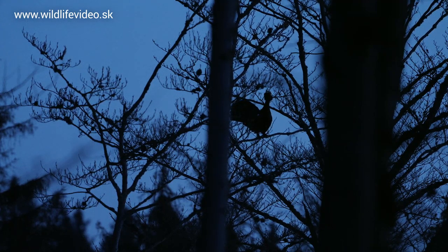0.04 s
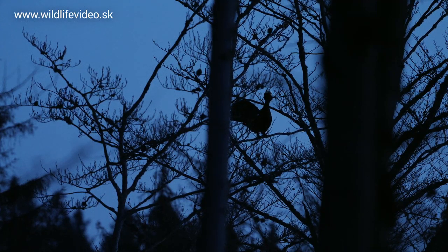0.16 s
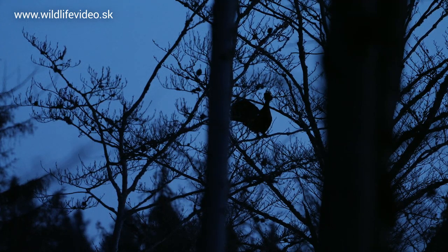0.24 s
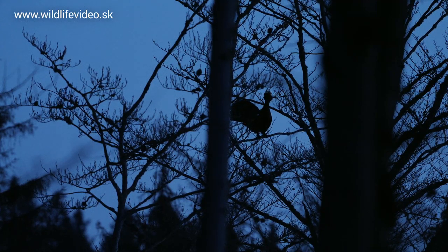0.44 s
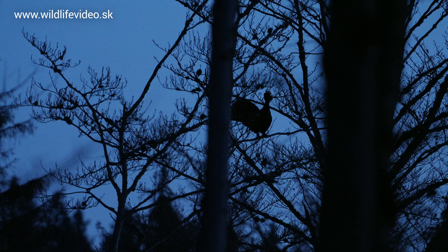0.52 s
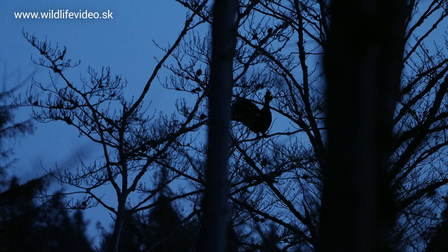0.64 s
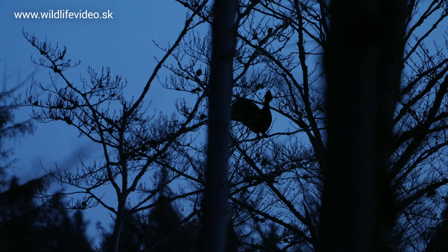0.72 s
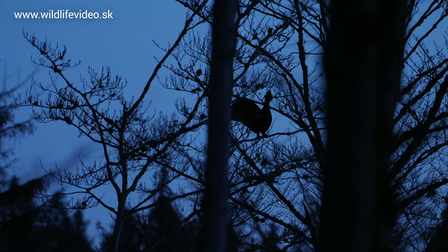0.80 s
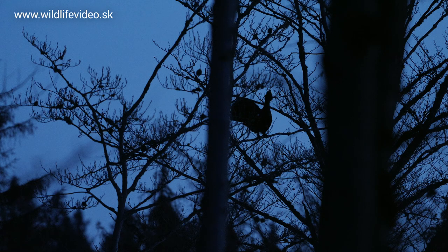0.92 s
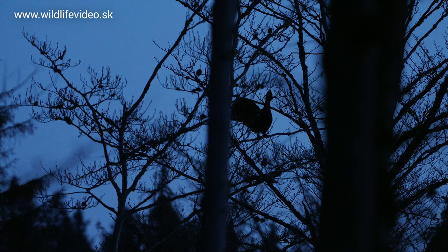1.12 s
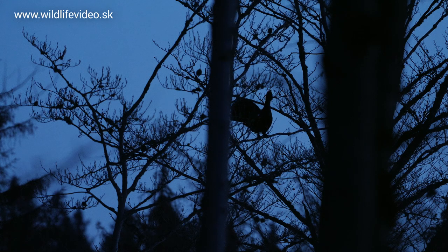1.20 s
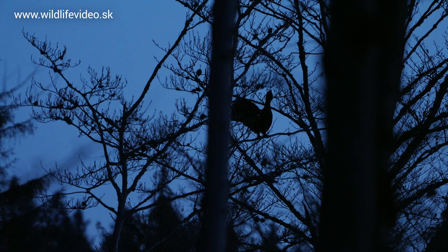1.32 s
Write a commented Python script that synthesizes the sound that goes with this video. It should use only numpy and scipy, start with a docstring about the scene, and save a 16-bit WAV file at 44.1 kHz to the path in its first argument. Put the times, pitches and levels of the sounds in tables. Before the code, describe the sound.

A capercaillie makes three sharp, hollow clicks at about 0.2, 0.35 and 0.4 seconds, each weaker, with a slight echo from the trees and soft low thuds underneath. Just before, a small bird gives a brief buzzy whistle that rises and falls. From 0.5 to about 1.3 seconds, small birds chirp faintly further off. A soft, steady forest hush continues throughout.

```python
"""A still forest at dawn, with a soft steady hush throughout. First a small bird gives a buzzy whistle.
From 0.2 s a capercaillie on a branch makes three hollow clicks, over a few soft low thuds.
Each click rings its throat and beak, a low pop follows, and the trunks scatter it back.
From 0.5 s on, small birds sing further off."""
import sys
import numpy as np
from scipy import signal
from scipy.io import wavfile
from scipy.ndimage import uniform_filter1d

SR = 44100
rng = np.random.default_rng(int(sys.argv[2]) if len(sys.argv) > 2 else 0)


def store_pcm(level_fs):
    """Save levels as 16-bit WAV."""
    pcm = np.round(np.clip(level_fs, -1, 1) * 32767).astype(np.int16)
    wavfile.write(sys.argv[1], SR, np.atleast_2d(pcm).T)


N = 59535


def amp(db):
    return 10 ** (np.asarray(db) / 20)


def unit_strength(x):
    return x / np.sqrt(np.mean(x ** 2) + 1e-20)


def look_up(table, hz):
    """A table's value at any pitch, blended between its rows."""
    row_hz, value = np.transpose(table)
    return np.interp(np.log(hz + 1), np.log(row_hz), value)


def add(mix, start_s, sound):
    part = mix[max(round(start_s * SR), 0):][:len(sound)]
    part += sound[:len(part)]


def drift(count, size):
    """A smooth random wobble; a bigger size makes it slower."""
    return unit_strength(uniform_filter1d(uniform_filter1d(rng.standard_normal(count), size), size))


def tone(hz):
    return np.sin(2 * np.pi * np.cumsum(hz) / SR)


# How strong the hush is from low to high: (pitch [Hz], relative level [dB])
HUSH_SHAPE = [(20, -11), (40, -13.5), (100, -25.5), (170, -33.5), (215, -28), (300, -14), (400, -5.5),
              (500, -6), (590, 0.5), (660, -8.5), (770, -1.5), (1100, -8.5), (1700, -10.5), (2700, -8.5),
              (3350, -13), (3800, -12.5), (5000, -26), (5700, -35.5), (6500, -40.5), (15500, -39.5)]
def hush(level_db=-52, patchy_db=1.5):
    """Steady distant air in the forest, slightly patchy."""
    hz, _, noise = signal.stft(rng.standard_normal(N), SR, nperseg=2048, noverlap=1536)
    patches = uniform_filter1d(rng.standard_normal(noise.shape), size=8, axis=0)
    patches = unit_strength(uniform_filter1d(patches, size=10, axis=1))
    noise *= amp(look_up(HUSH_SHAPE, hz)[:, None] + patchy_db * patches)
    air = signal.istft(noise, SR, nperseg=2048, noverlap=1536)[1][:N]
    return amp(level_db) * unit_strength(air)


# Soft bumps: (time [s], pitch [Hz], fade time [s], level [dB]). A fade time is a drop of 60 dB.
THUDS = [(0.213, 24, 0.38, -48), (0.305, 67, 0.034, -40.5), (0.352, 188.5, 0.099, -52)]
def thuds():
    """Dull low thuds that die away quickly."""
    out, t = np.zeros(N), np.arange(SR // 2) / SR
    rise = 1 - np.exp(-t / 0.0016)
    for start, hz, fade_s, db in THUDS:
        add(out, start, rise * amp(db - 60 * t / fade_s) * np.sin(2 * np.pi * hz * t))
    return out


# How long sound lingers among the trees: (pitch [Hz], fade time [s])
FOREST_FADE = [(200, 0.41), (1500, 0.97), (2700, 0.5), (5000, 0.21), (12000, 0.17)]
def forest_echo(x):
    """The trees scatter sound into a soft blur; the highest pitches die first."""
    hz, t, noise = signal.stft(rng.standard_normal(SR), SR, nperseg=256)
    fade = amp(-60 * t / look_up(FOREST_FADE, hz)[:, None])
    rise = np.minimum(t / 0.0053, 1)
    tail = signal.istft(noise * fade * rise, SR, nperseg=256)[1]
    return signal.fftconvolve(x, tail / np.linalg.norm(tail))[:N]


# One echo for each trunk: (delay [s], level [dB], dulled above [Hz])
TRUNK_ECHOES = [(.0235, -23.5, 6000), (0.0463, -21.5, 1890), (.0529, -27, 2060), (0.0703, -25.5, 2200)]
def trunk_echoes(x):
    """The nearest trunks throw the sound back, duller than before."""
    out = np.zeros(N)
    for delay, db, dull_hz in TRUNK_ECHOES:
        dull = signal.butter(2, dull_hz, fs=SR, output="sos")
        add(out, delay, amp(db) * signal.sosfilt(dull, x))
    return out


# Far songbird notes: (time [s], length [s], start pitch [Hz], end pitch [Hz], level [dB])
FAR_NOTES = [(0.506, 0.068, 2320, 2210, -62), (.57, .16, 3480, 3895, -62), (.62, 0.234, 3736, 3807, -61),
             (0.777, 0.029, 2850, 2600, -71), (0.89, 0.032, 2820, 2710, -59),
             (0.909, .04, 2253, 2307, -58.5), (1.006, 0.03, 2783, 2510, -56),
             (1.089, 0.028, 2830, 2576, -54), (1.141, 0.053, 2280, 2173, -56.5),
             (1.203, 0.0175, 4200, 3270, -53.5), (1.21, .018, 3114, 2036, -51.5),
             (1.269, 0.022, 3690, 2880, -55), (1.288, 0.026, 2810, 2530, -55)]
def far_birds(echo_db=-3.5, waver=0.028):
    """Faint sliding whistles, blurred by the trees."""
    out = np.zeros(N)
    for start, length, from_hz, to_hz, db in FAR_NOTES:
        progress = np.linspace(0, 1, int(length * SR))
        pitch = from_hz + (to_hz - from_hz) * progress
        pitch *= 1 + waver * drift(N, size=70)[:len(pitch)]
        add(out, start, amp(db) * np.sqrt(2) * np.sin(np.pi * progress) * tone(pitch))
    return out + amp(echo_db) * forest_echo(out)


# The path of the buzzy whistle: (time [s], pitch [Hz], level [dB])
WHISTLE_PATH = [(0, 1950, -43.5), (0.032, 2250, -50.5), (0.044, 2900, -43), (0.065, 3250, -38),
                (0.09, 3350, -37), (0.104, 3200, -48.5), (.125, 2320, -40.5), (0.152, 1920, -45),
                (0.188, 1884, -53), (.215, 1895, -56)]
def buzzy_bird(trill_hz=211.1, swing_hz=248, echo_db=-6.5):
    """A whistle that arches up and down with a fast, uneven trill on it."""
    t = np.arange(N) / SR
    times, hz, db = np.transpose(WHISTLE_PATH)
    trill = tone(trill_hz * (1 + 0.099 * drift(N, size=200)))
    pitch = np.interp(t, times, hz) + swing_hz * trill + 70 * drift(N, size=30)
    voice = tone(pitch) * amp(np.interp(t, times, db)) * (t < times[-1])
    return voice + amp(echo_db) * forest_echo(voice)


# The tones of the throat and beak:
# (pitch [Hz], base fade time [s], level in click 1 [dB], in click 2 [dB], in click 3 [dB])
THROAT_TONES = [(743.3, 0.073, -36, -37.5, -42), (1075, 0.024, -27, -30.5, -38),
                (1270, 0.012, -26.5, -21, -58), (1490, 0.075, -16.5, -26, -30.5),
                (2250, 0.045, -14.5, -22.5, -42), (2537, 0.045, -15.0, -18.5, -33),
                (2658, 0.022, -7, -50, -27.5), (2807, 0.0055, -2.5, -57, -16.5),
                (3194, 0.026, -15.0, -16, -30), (3740, 0.026, -34, -20, -31.0),
                (4148, 0.036, -31, -34, -40), (4590, 0.037, -41, -46, -63), (4970, 0.017, -41, -70, -77)]
def throat_ring(t, click_index, fade_scale):
    """The throat and beak ring with many tones at once; every other one starts upside down."""
    ring = np.zeros(len(t))
    for row, (hz, fade_s, *levels) in enumerate(THROAT_TONES):
        fade = amp(levels[click_index] - 60 * t / (fade_s * fade_scale))
        ring += (-1) ** row * fade * np.sin(2 * np.pi * hz * t)
    return ring


def throat_push(t, hz=1130, width_s=0.00052):
    """A small soft push as the throat opens."""
    from_peak = t - 3 * width_s
    return np.exp(-(from_peak / width_s) ** 2) * np.cos(2 * np.pi * hz * from_peak)


def low_pop(t, hz, rise_s=0.0064, fade_s=0.047, sag=0.11, sag_s=0.008):
    """A low tone that swells and fades while its pitch sags."""
    swell = np.minimum(t / rise_s, 1) * amp(-60 * np.maximum(t - rise_s, 0) / fade_s)
    return swell * tone(hz * (1 + sag * (np.exp(-t / sag_s) - 0.5)))


# The three clicks: (time [s], ring length [times base], pop delay [s], middle pop pitch [Hz],
# pop level [dB], tick level [dB], rebound delay [s], rebound level against the click [dB])
HOLLOW_CLICKS = [(.2040, 0.96, 0.0019, 381, -26.5, -44.5, .0026, -9.5),
                 (.3432, 0.87, .006, 353, -33.5, -52, .0016, -20),
                 (.3949, 0.94, 0.0032, 354.6, -41, -64, .0016, -19)]
def capercaillie(snap_s=0.00038, tick_fade_s=0.017, push_early_s=0.00193, push_db=-24.5):
    """A snap and its quick rebound ring the throat with a bright tick; a low pop swells just after."""
    out, t = np.zeros(N), np.arange(SR // 4) / SR
    treble = signal.butter(2, [4500, 8550], "band", fs=SR, output="sos")
    for index, row in enumerate(HOLLOW_CLICKS):
        start, fade_scale, pop_delay, pop_hz, pop_db, tick_db, rebound_delay, rebound_db = row
        hiss = unit_strength(signal.sosfilt(treble, rng.standard_normal(len(t))))
        tick = hiss * amp(tick_db - 60 * t / tick_fade_s)
        click = (throat_ring(t, index, fade_scale) + tick) * (1 - np.exp(-t / snap_s))
        add(out, start - push_early_s, amp(push_db) * abs(click).max() * throat_push(t))
        add(out, start, click)
        add(out, start + rebound_delay, amp(rebound_db) * click)
        add(out, start + pop_delay, amp(pop_db) * low_pop(t, pop_hz))
    return out


def scene():
    clicks = capercaillie()
    echoes = trunk_echoes(clicks) + amp(-22) * forest_echo(clicks)
    small_birds = buzzy_bird() + far_birds()
    return (hush() + thuds() + small_birds + echoes + clicks)[None]


def record(dry, top_hz=15760):
    """Cuts away the very highest pitches."""
    return signal.oaconvolve(dry, signal.firwin(511, top_hz, window=("kaiser", 9), fs=SR)[None], "same")


dry = scene()
out = record(dry)
store_pcm(out)
```